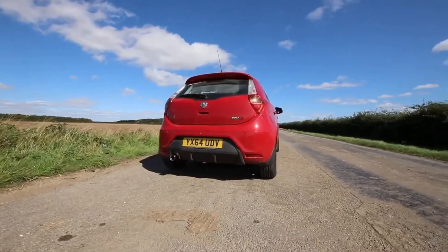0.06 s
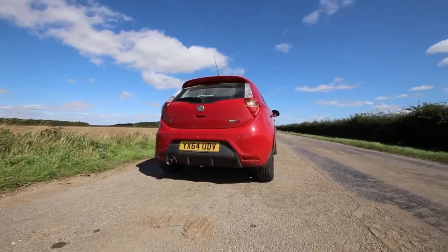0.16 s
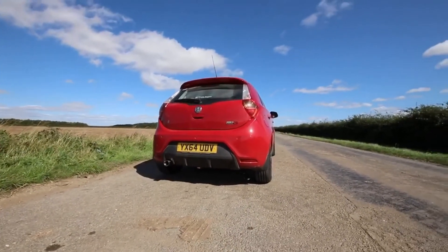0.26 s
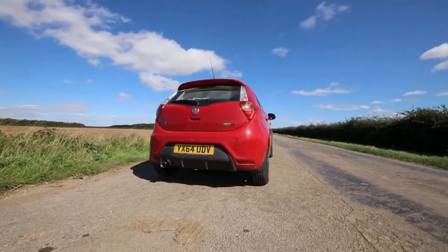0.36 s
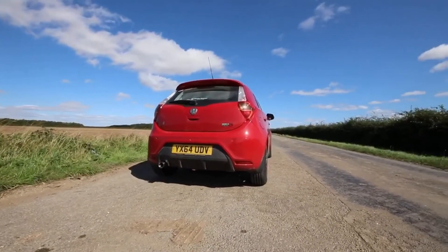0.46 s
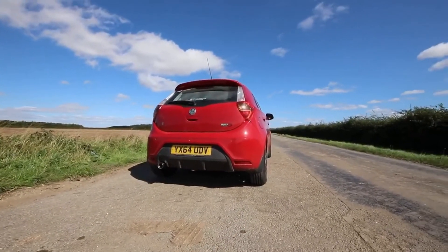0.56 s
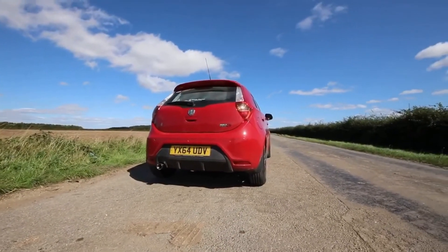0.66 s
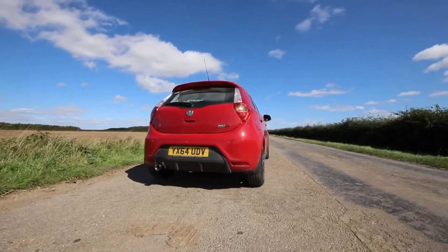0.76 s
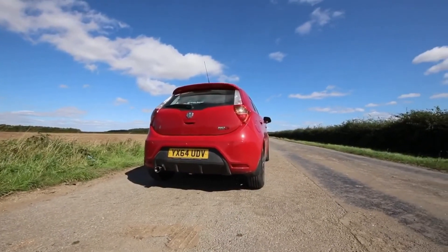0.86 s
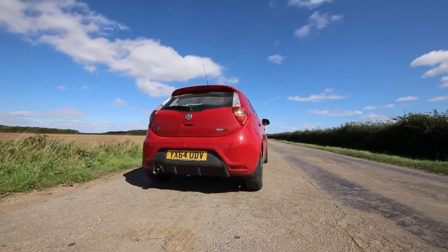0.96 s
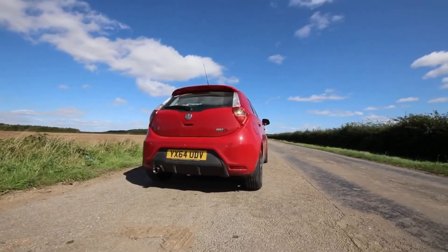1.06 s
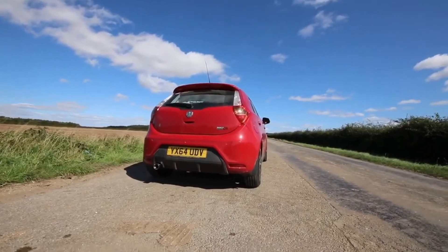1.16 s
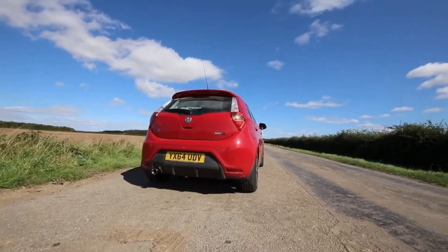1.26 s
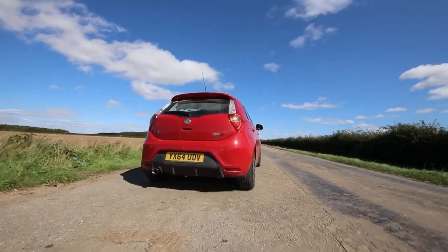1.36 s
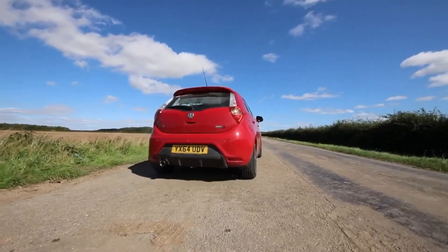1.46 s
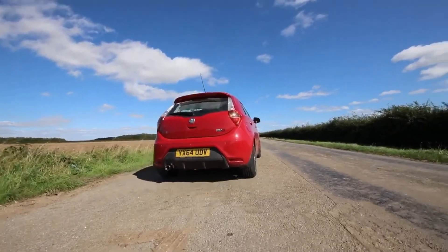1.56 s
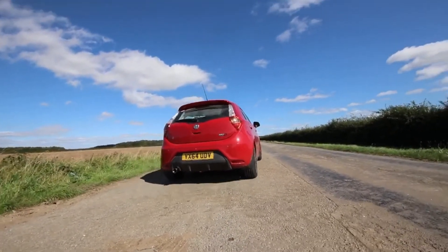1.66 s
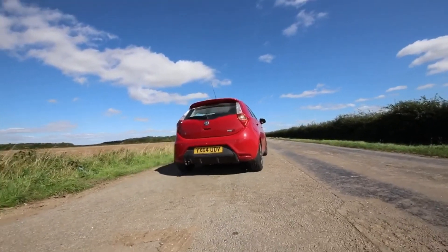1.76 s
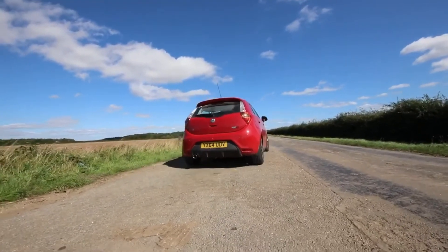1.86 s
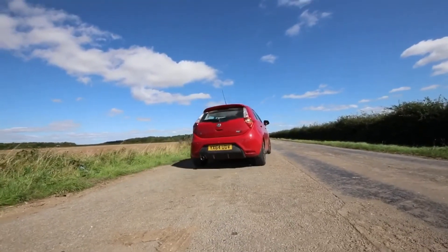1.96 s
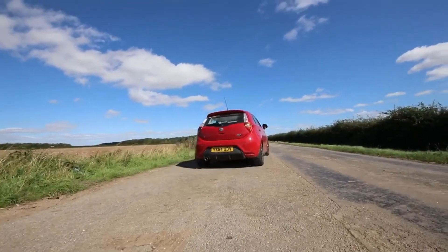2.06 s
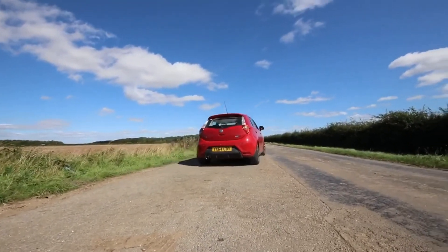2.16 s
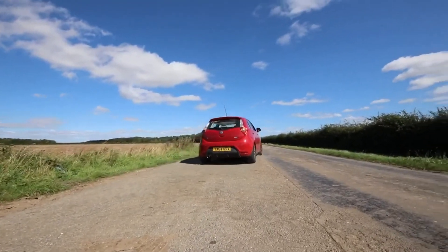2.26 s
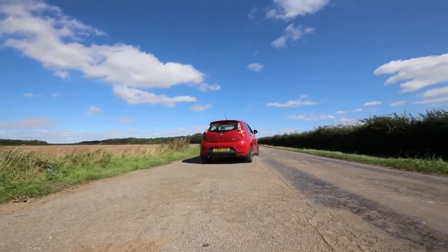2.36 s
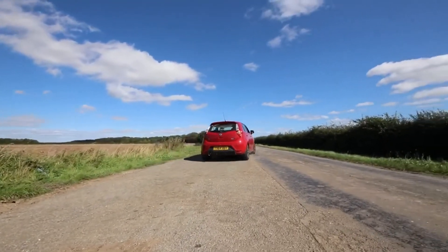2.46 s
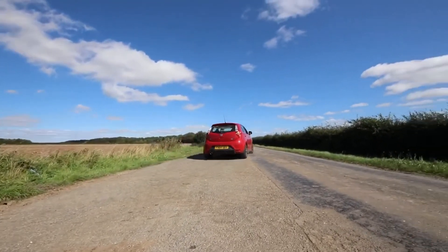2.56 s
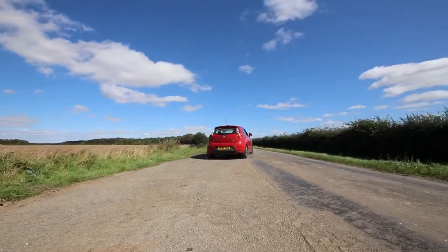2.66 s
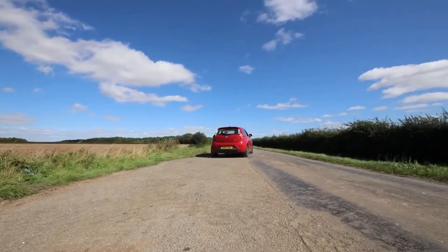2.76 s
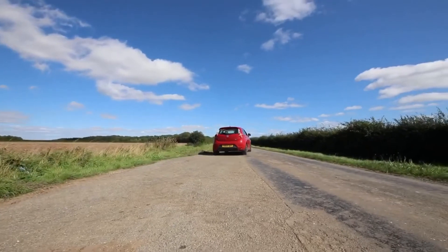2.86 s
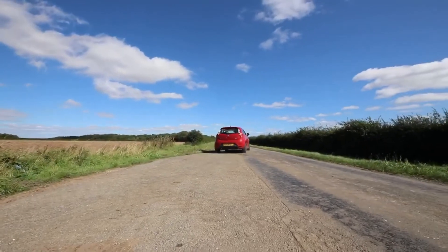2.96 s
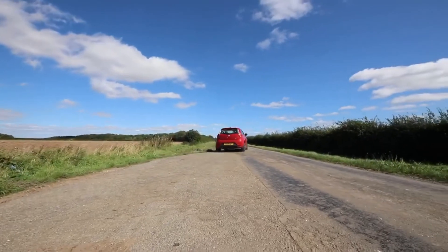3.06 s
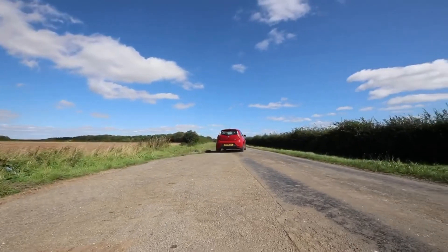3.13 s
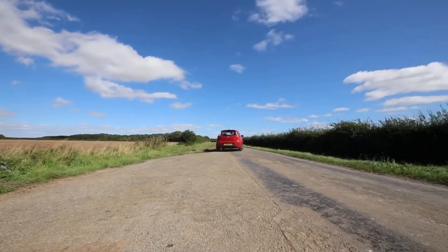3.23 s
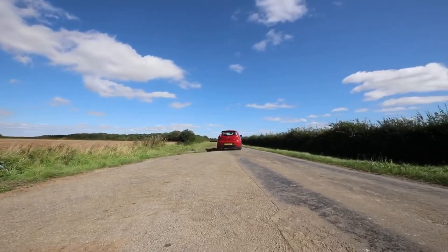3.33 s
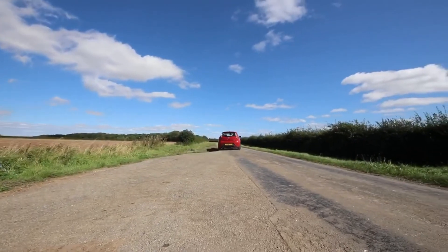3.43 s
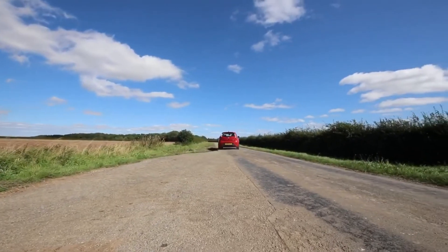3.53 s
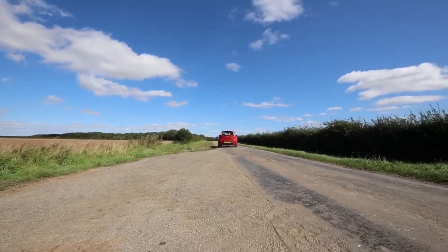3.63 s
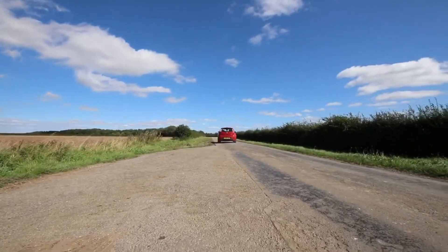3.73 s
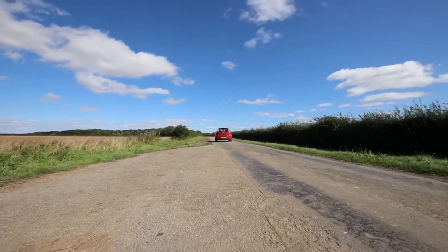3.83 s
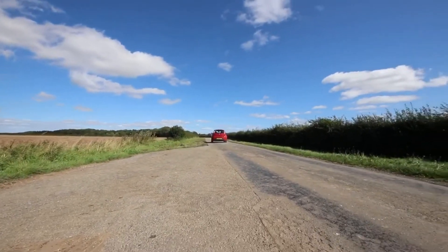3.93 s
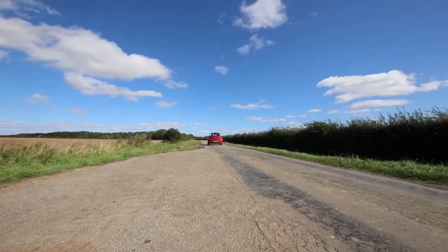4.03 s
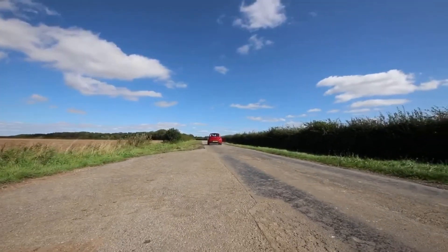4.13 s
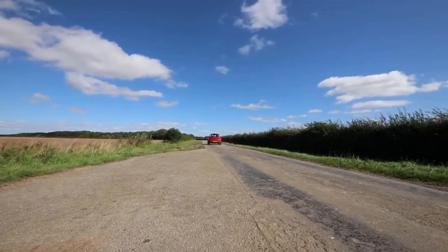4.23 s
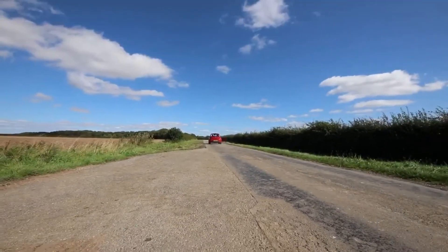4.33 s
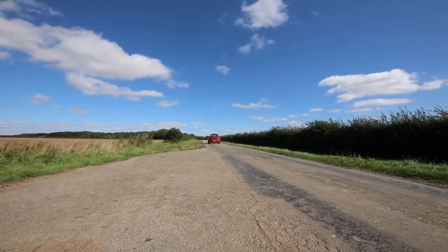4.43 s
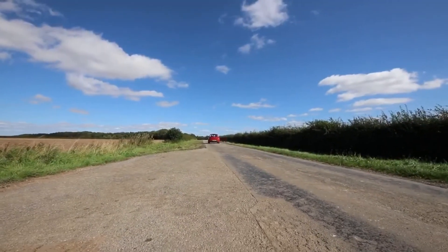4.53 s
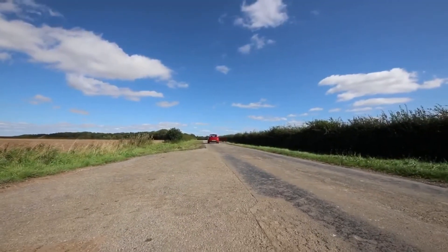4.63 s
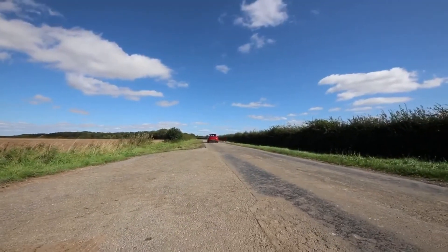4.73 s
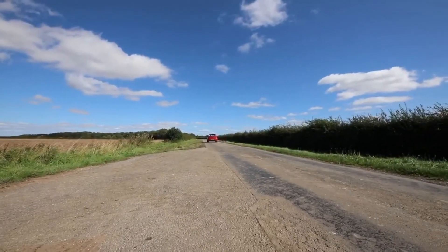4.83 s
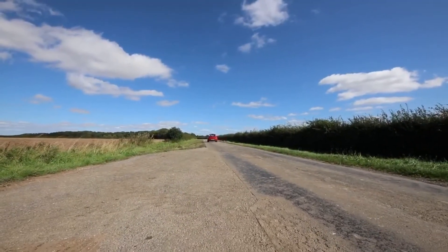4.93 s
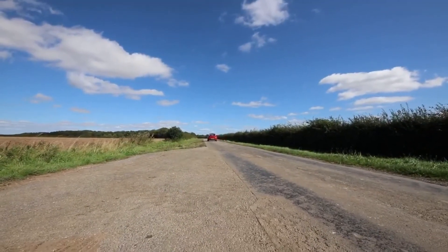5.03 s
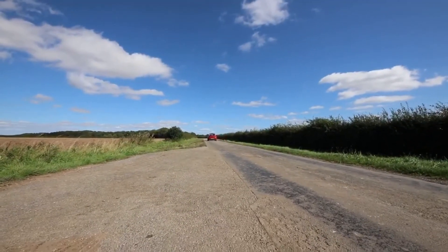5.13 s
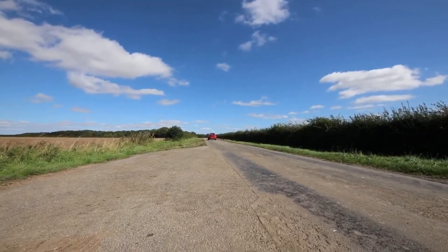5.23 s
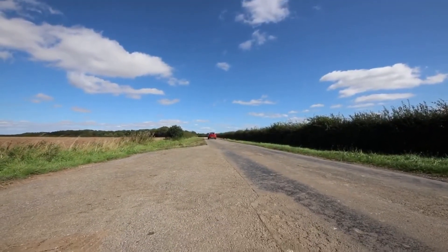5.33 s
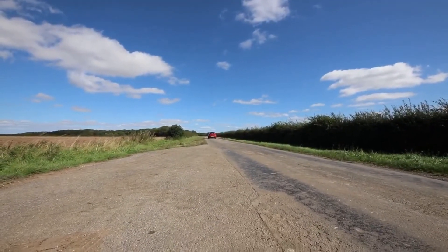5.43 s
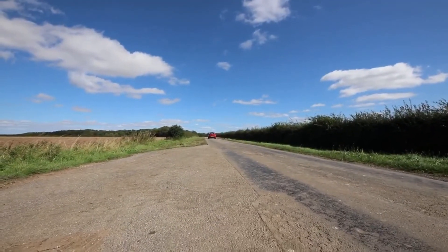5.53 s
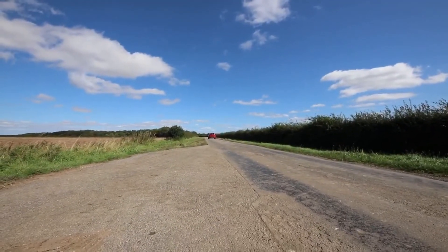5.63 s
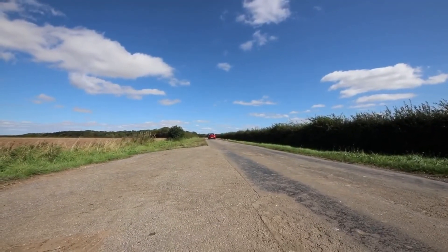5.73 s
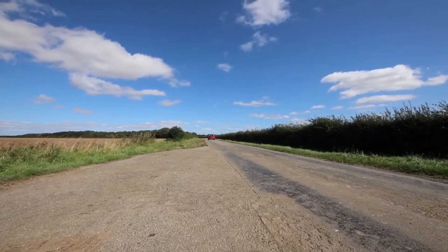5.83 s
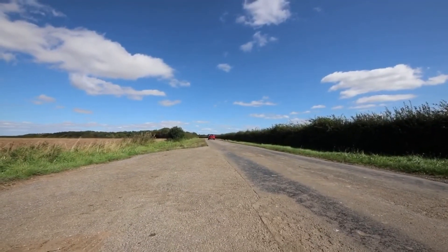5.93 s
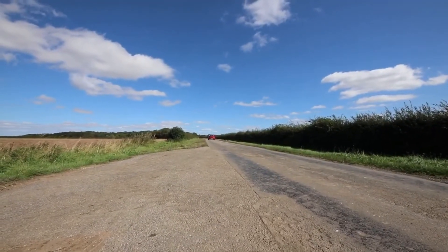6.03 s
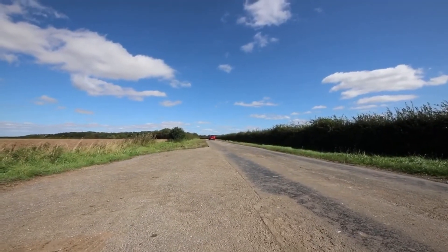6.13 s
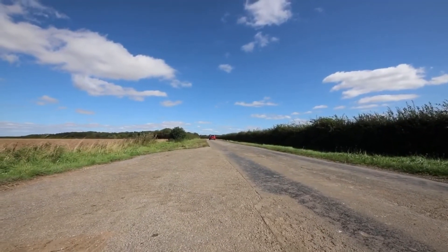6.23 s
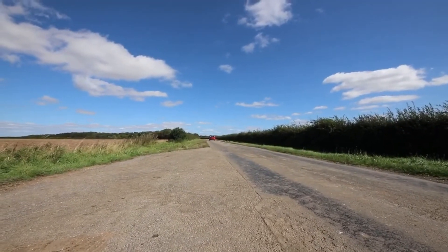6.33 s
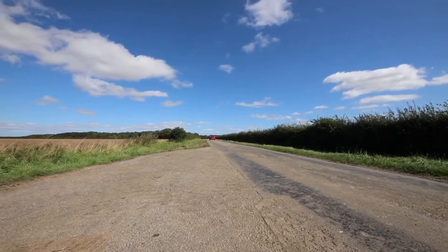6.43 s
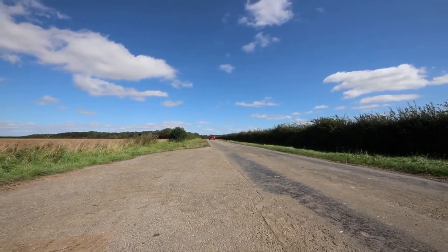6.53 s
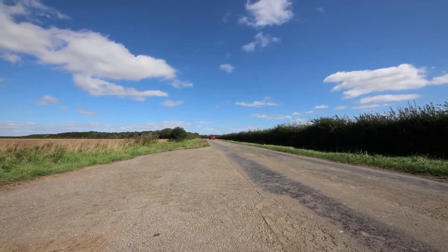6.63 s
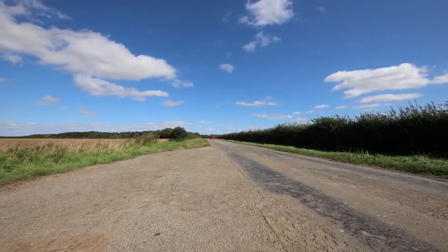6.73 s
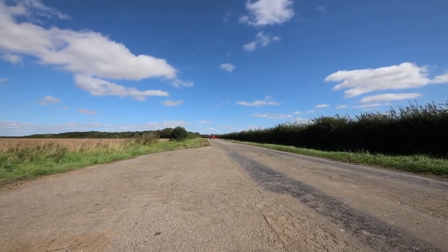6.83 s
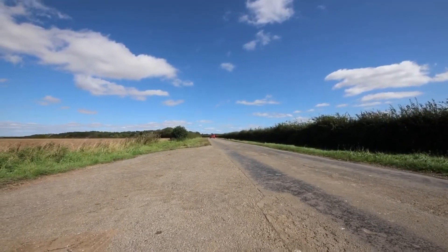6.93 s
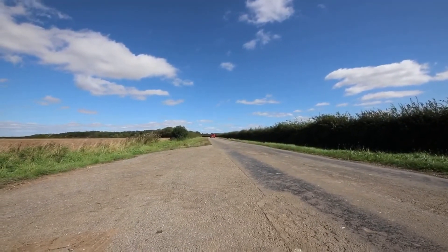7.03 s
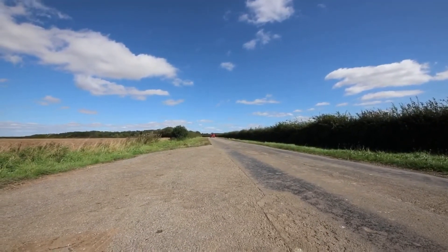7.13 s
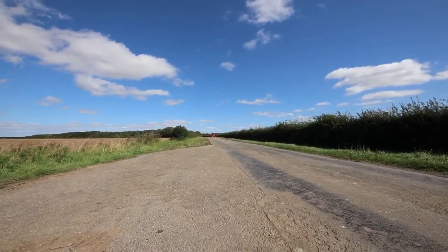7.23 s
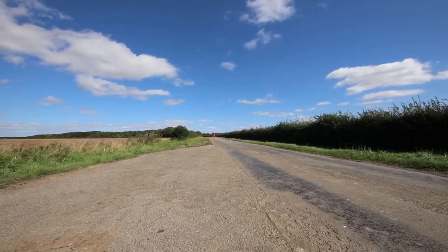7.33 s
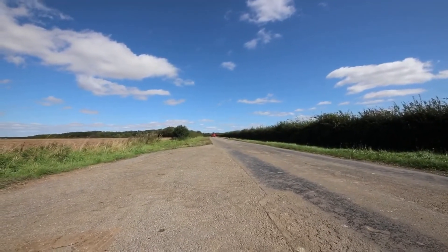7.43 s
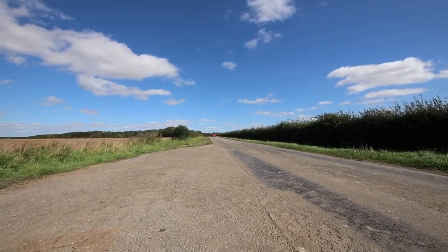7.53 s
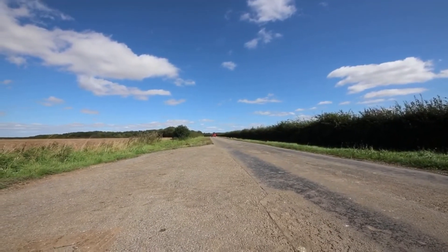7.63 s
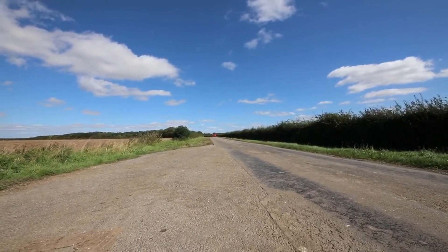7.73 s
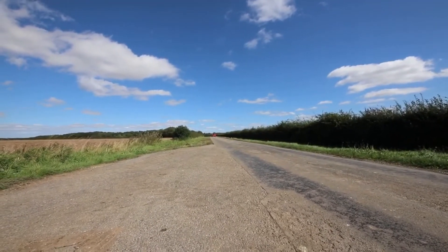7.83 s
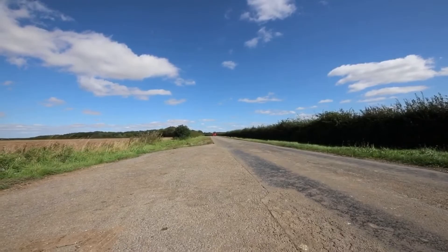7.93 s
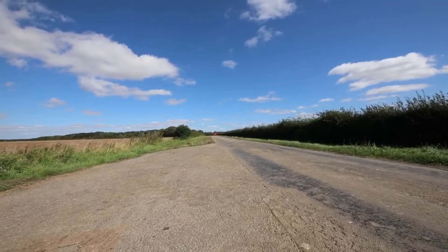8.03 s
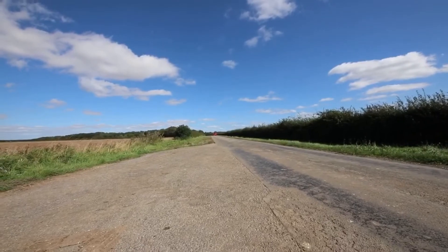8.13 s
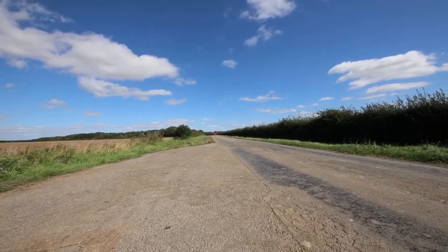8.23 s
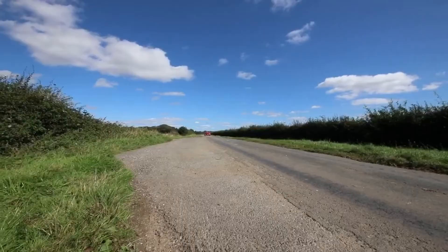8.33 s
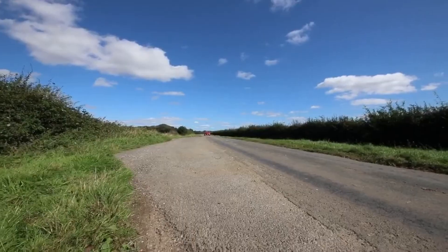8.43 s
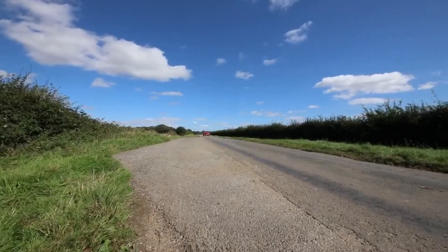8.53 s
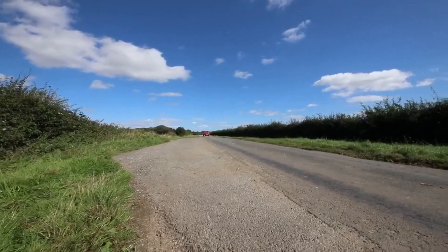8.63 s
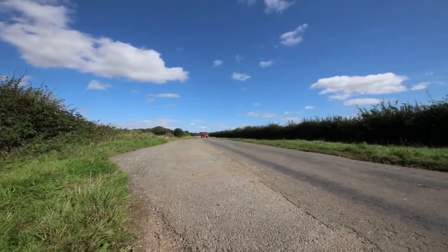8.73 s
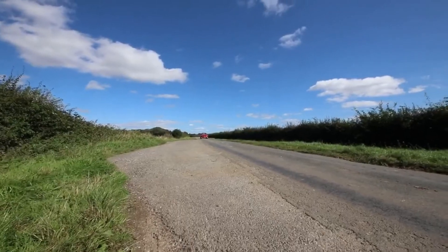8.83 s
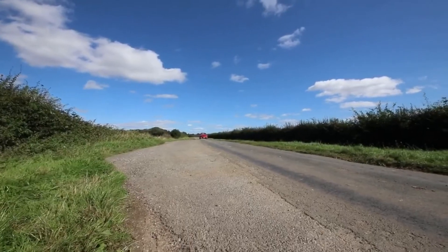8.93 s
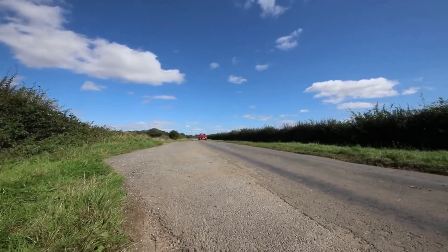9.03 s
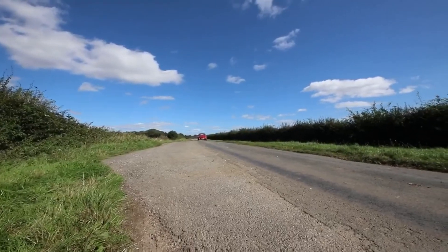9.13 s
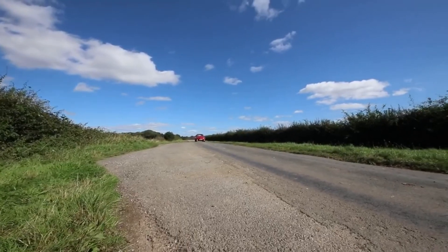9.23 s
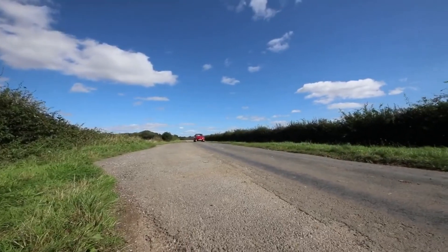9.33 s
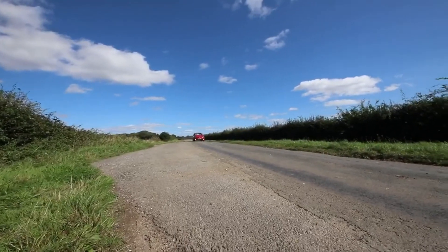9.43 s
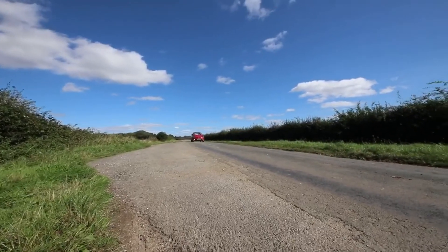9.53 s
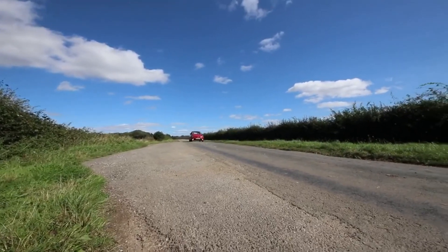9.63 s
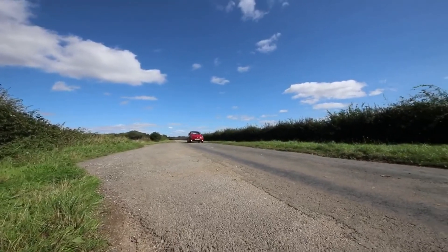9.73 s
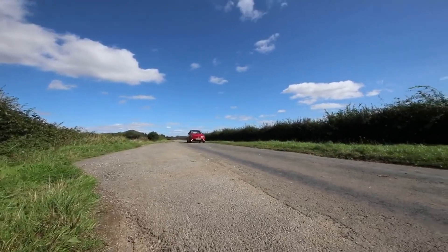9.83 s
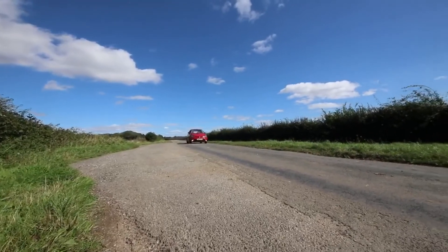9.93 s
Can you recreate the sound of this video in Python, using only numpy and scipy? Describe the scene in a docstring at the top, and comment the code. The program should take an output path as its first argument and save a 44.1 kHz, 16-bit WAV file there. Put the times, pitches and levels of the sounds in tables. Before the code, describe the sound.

Outdoors on an open lane, a small four-cylinder car with a loud exhaust slips its clutch right beside a roadside microphone, revs, shudders through a gear change with ticking grit, then accelerates away. It shifts again and fades while wind slaps the microphone. After an abrupt cut the tyre roar swells as the car returns, over a thin hedge hiss.

```python
"""A small four-cylinder car with a loud exhaust slips its clutch beside the microphone, pulls through first gear,
shudders through a shift as grit ticks and drives off down a lane, shifts up again and fades as wind slaps the ports.
After a cut at 8.3 s it comes back towards the microphone, its tyres roaring. The hedge hisses throughout.
The exhaust is sines at multiples of one firing rate, through pipe resonances, plus noise puffed by the firings;
tyres, hedge and grit are shaped noise, and wind is low noise plus short swings of pressure."""
import sys
import numpy as np
from scipy import signal
from scipy.io import wavfile
from scipy.ndimage import uniform_filter1d

SR = 44100
rng = np.random.default_rng(int(sys.argv[2]) if len(sys.argv) > 2 else 0)


def inscribe(sig):
    """Save sig as 16-bit PCM at rate SR to the path in sys.argv[1].

    A 1-D sig is mono; a 2-D sig holds one channel per row.
    Samples are clipped to [-1, 1] before scaling.
    """
    pcm = np.round(np.clip(np.atleast_2d(sig).T, -1, 1) * 32767)
    wavfile.write(sys.argv[1], SR, pcm.astype(np.int16))


N = 440118
T = np.arange(N) / SR
CUT_S, FADE_IN_S = 8.3364, .013  # the cut between the two passes, and the fade-in after it
LEFT_RIGHT = np.array([[1], [-1]])  # opposite signs at the two ports


def undb(db):
    """Amplitude of a level in dB."""
    return 10 ** (np.asarray(db) / 20)


def unit(x):
    """Scales to rms 1."""
    return x / np.sqrt(np.mean(x ** 2))


def curves(table):
    """Columns of a table, joined by straight lines in time."""
    s, *columns = np.transpose(table)
    return [np.interp(T, s, c) for c in columns]


def dips(table):
    """Sum of short flat-topped changes in level, dB."""
    return sum(db * np.exp(-((T - s) / w) ** 4) for s, db, w in table)


def walk(rate):
    """Random levels held 1 / rate s and slewed twice; spread near 1."""
    k = int(SR / rate)
    steps = np.repeat(rng.standard_normal(N // k + 1), k)
    return 1.28 * uniform_filter1d(uniform_filter1d(steps, k), k)[:N]


def filtered(x, hz, kind, order):
    """Butterworth filter."""
    return signal.sosfilt(signal.butter(order, hz, kind, fs=SR, output="sos"), x)


def band(lo_hz, hi_hz, order=2):
    """Band of noise, rms 1."""
    return unit(filtered(rng.standard_normal(N), [lo_hz, hi_hz], "bandpass", order))


SWELL = .5  # shared swell of all bands against the flicker of each
LEAN_HZ, HUMP_HZ = 2600, 1670  # centres of the band that leans to one side and of the band that fills out


def coloured(table, flicker_db, apart_hz, tilt_db, lean_db=0, hump_db=0):
    """Half-octave noise bands under a tilting spectrum swell together, flicker alone and widen upwards."""
    hzs, dbs = np.transpose(table)
    out, swell = 0, SWELL * walk(6)
    for hz in hzs[0] * 2 ** np.arange(.25, np.log2(hzs[-1] / hzs[0]), .5):
        mid, side = (band(hz / 2 ** .25, hz * 2 ** .25) for _ in range(2))
        # 10 log10(hz) turns level per Hz into level per band
        db = np.interp(np.log(hz), np.log(hzs), dbs) + 10 * np.log10(hz)
        db = db + flicker_db * (walk(9) + swell)
        db = db + hump_db * np.exp(-(2 * np.log2(hz / HUMP_HZ)) ** 2)
        db = db + tilt_db * np.log2(hz / 1200)
        lean = lean_db * np.exp(-(2 * np.log2(hz / LEAN_HZ)) ** 2) * LEFT_RIGHT / 2
        apart = min(0.009 + (hz / apart_hz) ** 2, 1)
        out = out + undb(db + lean) * (mid + apart * side * LEFT_RIGHT)
    return unit(out)


# Colour of a faint wide background noise. Each row: frequency in Hz, relative level in dB per Hz.
WIDE_COLOUR = [(600, -9), (1200, 1), (2000, -4), (3200, -7.5), (5200, -17)]
# Its level over time. Each row: time in seconds, level in dB.
WIDE_LEVEL = [(0, -79), (5.5, -75), (7.3, -75), (7.8, -59), (8.9, -55), (9.3, -76)]


def wide_noise():
    """Faint wide background: noise almost independent at the two ports in its treble."""
    return undb(curves(WIDE_LEVEL)[0]) * coloured(WIDE_COLOUR, flicker_db=2, apart_hz=500, tilt_db=0)


BREEZE_DB, BUFFET_DB = -59, 4  # breeze level; spread of the buffeting
GUST_EDGE, APART = 1.24, 0.1  # exponent of the gust's rise and fall; share of rumble that differs by port
# Gusts on the ports. Each row: middle in seconds, level in dB, half length in seconds, left minus right in dB.
GUSTS = [(0.452, -47, 0.31, 4), (2.156, -48.5, 0.14, 1), (3.696, -57, 0.38, 2), (4.646, -52, 0.052, -0.5),
         (5.127, -34, 0.093, 7), (5.6, -38, 0.11, 10), (5.904, -37.5, 0.15, 0.5),
         (7.076, -40.5, 0.19, -0.5), (7.673, -44, 0.056, 6), (8.455, -40.5, 0.12, -7),
         (8.95, -46.5, 0.29, 2.5), (9.35, -42, 0.095, 0), (9.702, -36, 0.2, 0)]


def wind_rumble():
    """A centred breeze and gusts that lean to one port: buffeted low noise from turbulence at the microphone."""
    both = band(34, 120)
    gusts = sum(undb(db + LEFT_RIGHT / 2 * lean_db) * np.exp(-np.abs((T - s) / half_s) ** GUST_EDGE)
                for s, db, half_s, lean_db in GUSTS)
    apart = np.array([APART * band(22, 71) for _ in range(2)]) * (T > 4.95)
    return (undb(BREEZE_DB) * both + gusts * (both + apart)) * undb(BUFFET_DB * walk(20))


# bright edge of a -19 dB slap against its swing; harder slaps are brighter, dB per dB
EDGE_DB, EDGE_SLOPE = -21.5, 0.85
# Wind slaps on the ports. Each row: middle in seconds, peak level in dB, frequency of the swing in Hz,
# left minus right in dB, half length in swings.
SLAPS = [(5.58, -22, 90, 20, 0.43), (5.618, -18.5, 151, 20, 0.36), (5.645, -21, 90, 19, 0.31),
         (5.669, -14, 100, 10, 0.55), (5.679, -14.5, 362, 12, 1.2), (5.69, -8.5, 254, 7, 0.48),
         (5.709, -23, 200, 12, 0.5), (5.807, -13.5, 120, 2, 0.55), (5.8745, -8.5, 292.5, 5.5, 0.62),
         (5.884, -14, 200, 3, 0.59), (6.0, -22, 149.6, 1.5, 0.44), (6.065, -16.5, 200, 6, 0.39),
         (6.995, -22, 110.6, 2, 0.54), (7.025, -24, 169.6, -1, 0.72), (7.074, -23, 150.1, 3, 0.62),
         (7.18, -22, 117, 1.5, .5), (7.636, -24, 111.2, 6, 0.43), (7.681, -23.5, 61.9, 1, 0.52),
         (8.315, -33, 90, 7, 0.59)]


def wind_slaps():
    """Slaps of air on the ports: a few swings of pressure with a noisy edge."""
    out, edge = 0, band(150, 888, order=3)
    for s, db, hz, lean_db, swings in SLAPS:
        turn = (T - s) * hz
        swing = np.sin(2 * np.pi * turn + 0.22) + undb(EDGE_DB + EDGE_SLOPE * (db + 19.0)) * edge
        out = out + undb(db + LEFT_RIGHT / 2 * lean_db) * np.exp(-(turn / swings) ** 2) * swing
    return out


# Tyres on the lane. Each row: time in seconds, roar in dB before the tilt, tilt in dB per octave about 1200 Hz.
ROAD = [(0.04, -44, 10), (0.56, -54.5, 11), (1.0, -40.5, 9), (1.53, -43, 6.5), (1.76, -43, -3),
        (1.8, -32, 2), (1.87, -28.5, 1), (1.93, -32.5, 0), (2.05, -39.5, 2.5), (2.3, -40, 3.5),
        (2.6, -38, 8), (2.91, -41.5, -1.5), (3.4, -39.5, 0.5), (3.9, -35, -0.5), (4.2, -38, -1.5),
        (4.45, -36.5, 6.5), (4.65, -41.5, -4.5), (5.04, -39, 2), (5.21, -40, -2.5), (5.95, -40.5, -2.5),
        (6.15, -40, 0.5), (6.5, -45, 3.5), (6.75, -40.5, 1.5), (6.95, -38, 1.5), (7.25, -38.5, -0.5),
        (7.48, -38, 0), (7.6, -41.5, 0), (7.78, -43.5, -0.5), (8.16, -48.5, -1), (8.6, -43.5, 2),
        (8.99, -38.5, 0.2), (9.3, -29, 1.5), (9.55, -25, 0.5), (9.75, -22.5, 3.5), (9.96, -19.5, 3.5)]
# The hedge's hiss. Each row: frequency in Hz, relative level in dB per Hz.
HISS_COLOUR = [(4000, -6.5), (5000, -25), (6500, 10), (8500, 8.5), (10500, 2.5), (12000, -12)]
# Swells of the hiss. Each row: middle in seconds, rise in dB, half width in seconds.
HISS_SWELLS = [(4.43, 1.5, .2), (5.06, 3, 0.15)]
# steady part dB, following part at a roar of -40 dB, dB per dB of roar, dB per unit of tilt
HEDGE_DB, HISS_DB, HISS_SLOPE, HISS_BRIGHT = -66, -65, 0.69, 0.91


def hedge_hiss():
    """Wide hiss: a steady part joined by a part that follows the tyre roar."""
    roar_db, tilt_db = curves(ROAD)
    hiss_db = HISS_DB + HISS_SLOPE * (roar_db + 40) + HISS_BRIGHT * tilt_db + dips(HISS_SWELLS)
    level = np.hypot(undb(hiss_db), undb(HEDGE_DB))
    return level * coloured(HISS_COLOUR, flicker_db=1.5, apart_hz=6500, tilt_db=0)


# The tyres' colour. Each row: frequency in Hz, relative level in dB per Hz.
ROAR_COLOUR = [(110, -1.5), (200, 3.5), (450, 4), (650, -4.5), (1000, 1), (1400, -4.5), (1900, -10.5),
               (3000, -22), (4100, -35), (5200, -49)]
# The band around HUMP_HZ fills out and hollows over time. Each row: time in seconds, change in dB.
HUMP = [(1.9, -2), (4.2, -1.5), (6.0, 1.5), (7.7, 4), (8.5, -4.5), (9.8, 1.5)]


def tyre_roar():
    """Tyres on the road: nearly centred noise whose treble leans right."""
    roar_db, tilt_db = curves(ROAD)
    return undb(roar_db) * coloured(ROAR_COLOUR, flicker_db=1.9, apart_hz=7000, tilt_db=tilt_db,
                                    lean_db=-2, hump_db=curves(HUMP)[0])


GRAIN_DB = 5  # spread of the fast grain
# Grit under the tyres. Each row: middle in seconds, level of the top band in dB, half length in seconds,
# low band against the top in dB.
TICKS = [(1.784, -57, 0.013, 15.5), (1.869, -46.5, 0.023, 8), (1.995, -62, 0.011, 22.5),
         (2.18, -51, 0.024, 14), (2.6, -60, 0.013, 25.5), (2.859, -40, 0.0011, 5),
         (2.87, -36.5, 0.0015, 8.5), (2.877, -42.5, 0.0029, 5), (3.678, -48, 0.0041, 2),
         (3.825, -46.5, 0.0041, 13), (6.165, -55, 0.0021, 7)]


def grit():
    """Short grainy bursts of noise, wide on top, centred below."""
    top, low = np.array([band(5700, 9100) for _ in range(2)]), band(590, 1900)
    grain = unit(undb(GRAIN_DB * walk(300)))
    return grain * sum(undb(db) * np.exp(-((T - s) / half_s) ** 2) * (top + undb(low_db) * low)
                       for s, db, half_s, low_db in TICKS)


# A thin whine that falls and rises with the engine. Each row: time in seconds, frequency in Hz, rms level in dB.
WHINE = [(.15, 1460, -70), (.19, 1476, -59), (.3, 1380, -53), (.4, 1353, -65), (.53, 1218, -67),
         (.59, 1145, -52), (.68, 1105, -55), (.76, 1144, -48), (.79, 1210, -75)]


def thin_whine():
    """One gliding sine of wavering level."""
    hz, db = curves(WHINE)
    return np.sqrt(2) * undb(db + 1.5 * walk(25)) * np.sin(2 * np.pi * np.cumsum(hz) / SR)


# The exhaust shudders as the engine bogs down or the throttle shuts.
# Each row: middle in seconds, level in dB, half length in seconds.
SHUDDERS = [(0.195, -29, 0.041), (1.862, -42, 0.047), (2.15, -34.5, 0.18), (4.651, -39, 0.035)]


def shudder():
    """Brief bursts of low noise from the exhaust."""
    return band(75, 264) * sum(undb(db) * np.exp(-((T - s) / half_s) ** 4) for s, db, half_s in SHUDDERS)


CLATTER_GATE = .45  # depth by which the firings chop the clatter
# Valves and tailpipe. Each row: time in seconds, valve clatter in dB, rasp of the tailpipe in dB.
CLATTER = [(0, -81, -35.5), (.2, -51, -62), (.65, -60, -63.5), (1.0, -54, -36), (1.5, -51.5, -33.5),
           (1.75, -58, -48.5), (2.3, -57, -50.5), (2.65, -50.5, -37.5), (3.1, -53, -45), (4.55, -54, -39),
           (4.75, -52, -65), (5.06, -47.5, -46), (5.17, -51.5, -73), (5.3, -60, -55), (7.5, -87, -51.5),
           (8.0, -89, -94)]


def valve_clatter(phase):
    """Two bands of noise chopped once a firing."""
    chop = unit(np.exp(CLATTER_GATE * np.cos(phase - 2)))
    level = undb(curves(CLATTER)[0] + 2.26 * walk(24.84))
    return level * chop * (band(900, 1450) + band(1815, 3260))


# The engine slips the clutch, pulls through first gear, shifts with a shudder, coasts; then comes back.
# Each row: time in seconds, firing rate in Hz.
REVS = [(0.0, 94.2), (0.06, 101.7), (0.13, 111.4), (0.235, 98.45), (0.29, 102.6), (0.5, 91.76), (0.71, 81),
        (0.82, 96.6), (1.05, 129.3), (1.17, 132.7), (1.3, 127.7), (1.6, 107.8), (1.99, 80.1), (2.19, 75.15),
        (2.35, 80.4), (2.47, 86.05), (3.0, 111.6), (3.15, 118.8), (3.3, 123), (3.42, 129.7), (4.0, 161.4),
        (4.41, 176.7), (4.5, 181.8), (4.61, 168.1), (4.89, 146.4), (5.05, 143), (5.12, 129.4), (5.18, 97.3),
        (5.23, 96.7), (5.37, 117.3), (5.5, 101.4), (5.6, 113), (5.76, 109.8), (5.82, 114), (7.17, 132),
        (7.7, 132.7), (8.335, 100.4), (8.338, 132.5), (8.9, 132.9), (9.23, 129.2), (9.39, 124.8),
        (9.47, 115.7), (9.72, 113.5), (9.96, 97.5)]


def crank():
    """Firing rate, and its phase (one turn per firing) with a slight flutter."""
    hz, = curves(REVS)
    return hz, 2 * np.pi * np.cumsum(hz * (1 + 0.0029 * walk(40))) / SR


# driving away lowers the resonances as heard: gathers speed from, to (s), top speed m/s
SPEED_FROM_S, SPEED_TO_S, TOP_M_S = 2.91, 4.5, 23
# The exhaust. Each row: time in seconds, level in dB, brightness in dB per octave about 250 Hz,
# odd over even firing orders in dB.
LOAD = [(0.0, -21, -2, -5), (0.13, -24, -2, -2), (0.18, -28.5, 0.5, 1), (0.23, -27, -8.5, -3),
        (0.3, -27, -8, 0.5), (0.48, -24, -4.5, 5.5), (0.55, -30.5, -2, 2), (0.85, -24, -1.8, -4),
        (1.05, -24, -1.5, -9.5), (1.3, -23, 0, -8), (1.6, -22, 0, -3), (1.85, -29.5, -4.5, -3.5),
        (2.05, -29, 5.5, 7), (2.3, -33.5, 11, 2.5), (2.45, -29, 2.5, -0.5), (2.65, -26, 0.3, -6),
        (2.85, -26.5, 1.5, -1.5), (3.1, -27.5, 3.5, 1), (3.35, -27, 2, -6.5), (3.45, -26, 1.5, -1),
        (3.6, -23, 2, 0.5), (4.0, -21, 1.5, 4), (4.4, -22.5, 4.5, 3.5), (4.59, -21.5, 6.5, 2.5),
        (4.64, -30.5, 0, 0.5), (4.9, -28.5, -4, 3), (5.05, -24, -3.5, -10), (5.3, -28.5, -1.5, -1),
        (5.55, -25.5, -1.5, -3), (5.9, -27.5, -0.5, -1.5), (6.1, -32, 2.5, -2), (6.6, -33, 2.5, -6),
        (7.2, -32, 0.5, 2), (7.65, -38, 2.5, -3), (7.72, -48, -2, 10), (7.95, -46.5, -2, 4),
        (8.15, -46, -1, -1), (8.33, -46, -3, 6.5), (8.35, -55, 0, 27), (8.45, -44, -4.5, 7),
        (8.9, -38, 0, 2.5), (9.15, -38.5, -5, -5), (9.26, -45, -7, 4), (9.45, -51.5, -10, 1),
        (9.5, -35, -1, -5.5), (9.69, -37, -2.5, 0), (9.75, -59, -2, -2), (9.98, -34, 4, -5)]
# The engine note drops out. Each row: middle in seconds, change in dB, half width in seconds.
LIFTS = [(.155, -9, 0.015), (.705, -7, 0.03), (5.13, -13, 0.066), (9.22, -21, 0.046)]
# Pipe resonances at rest, which the firing orders slide through. Each row: frequency in Hz, gain in dB.
PIPE = [(75.0, 2), (85.0, -8.5), (105.0, 0.8), (145.0, -7.5), (205.0, 2), (240.0, -4.5), (295.0, -0.5),
        (350.0, -9), (405.0, -2), (465.0, -12), (520.0, -5), (560.0, -13), (650.0, -14), (900.0, -33)]
# Added colour when the car faces the microphone. Each row: frequency in Hz, gain in dB.
FRONT = [(100.0, 10), (200.0, -1.5), (400.0, -5.5), (520.0, 11.5), (650.0, -9)]
# The silencer's resonances. Each row: frequency in Hz, gain in dB against the rasp.
SILENCER = [(400, -2), (560, 7), (700, -3.5), (820, -5), (950, -13.5), (1150, -8.5), (1500, -42)]
# Rasp orders above RASP_TOP_HZ, buried at first, clear at full throttle. Each row: time in seconds, change in dB.
RASP_TOP, RASP_TOP_HZ = [(2.2, -9), (2.6, -2), (3.6, -2), (4.1, 2), (4.6, 2), (5.0, -6)], 860


def order_levels(hz):
    """Levels of 11 firing orders: five shaped by the pipe, six of rasp by the silencer; and the rasp itself."""
    def colour(f, table):
        hzs, dbs = np.transpose(table)
        return np.interp(np.log(f), np.log(hzs), dbs)

    level_db, bright, odd_db = curves(LOAD)
    level_db = level_db + dips(LIFTS)
    rasp_db = curves(CLATTER)[1] + dips(LIFTS)
    away = 1 + np.interp(T, [SPEED_FROM_S, SPEED_TO_S], [0, TOP_M_S / 343]) * (T < CUT_S)
    order_db = []
    for k in range(1, 6):
        db = level_db + (k % 2 - .5) * odd_db + bright * np.log2(k * hz / 250)
        order_db.append(db + colour(k * hz * away, PIPE) + (T > CUT_S) * colour(k * hz, FRONT))
    # the silencer lets little through above its last resonance
    for k in range(6, 12):
        top = np.clip((k * hz - RASP_TOP_HZ) / 60 + .5, 0, 1)
        order_db.append(rasp_db + np.interp(k * hz, *np.transpose(SILENCER)) + curves(RASP_TOP)[0] * top)
    return order_db, rasp_db


# rough at low revs, clean at high: dB per octave that the firing rate lies below ROUGH_HZ
ROUGH_HZ, ROUGH_DB_PER_OCT = 115, 5
# Ragged as the clutch bites and at each change of throttle. Each row: time in seconds, added roughness in dB.
RAGGED = [(0, 1), (.15, 2), (.19, 9), (.3, 5), (.5, 4), (.72, 4), (.85, 0), (1.7, 0), (1.85, 4), (1.95, -1),
          (2.4, -1), (2.55, 1), (2.65, -4), (3.0, -3), (4.55, -3), (4.65, 1), (5.15, 0), (5.3, -4),
          (5.9, -2), (6.2, 1), (7.6, 1), (7.8, 5), (8.33, 5), (8.4, 1)]


def roughness(hz):
    """Extra gas noise in dB; the lines between the orders take half of it."""
    return ROUGH_DB_PER_OCT * np.log2(ROUGH_HZ / hz) + curves(RAGGED)[0]


GAS_DB, RASP_HISS_DB = -13, -2  # noise against the upper orders' effort, and against the rasp
PUFF_DEPTH = .4  # how deeply the gas puffs


def exhaust_gas(phase, order_db, rasp_db, rough_db):
    """Turbulent gas: a low band that follows the effort and a rasping one, puffed once a firing."""
    puff = unit(np.exp(PUFF_DEPTH * np.cos(phase - 1)))
    effort = np.sqrt(sum(undb(db) ** 2 for db in order_db[1:]))
    low = effort * undb(GAS_DB + rough_db) * band(191, 517, order=4)
    rasp = undb(rasp_db + RASP_HISS_DB + rough_db) * band(630, 806, order=4)
    return puff * (low + rasp)


FRONT_LAG, TAIL_LAG = 1.7, .03  # radians; radians per squared order
HALF_DB, QUARTER_DB = -8.5, -11  # lines at half and quarter orders against their neighbours
WANDER = .2  # radians by which the orders drift, times sqrt(order - 1)
RASP_WAVER_DB, RASP_WANDER = 3.5, .6  # the rasp's orders are ragged in level (dB) and phase (radians)
STROKE_DB = .7  # scatter in strength from firing to firing
# How much the lower orders waver, more once the far car coasts. Each row: time in seconds, spread in dB.
WAVER = [(7.4, 1.2), (7.75, 3.5), (8.33, 3.5), (8.4, 1.5)]
# Strength of the half-order lines over time. Each row: time in seconds, change in dB.
HALVES = [(0, -1), (1.0, -6.5), (2.2, -1.5), (3.0, 5), (3.8, 2.5), (4.5, 6), (5.0, -4), (6.0, 1.5),
          (6.6, 4.5), (7.3, 2), (7.8, -2)]
# The cylinders differ mostly in the upper ring of the pipe. Each row: frequency in Hz, gain in dB.
UNEVEN = [(300, -24.5), (450, -2)]


def firing_orders(hz, phase, order_db, rough_db):
    """Sines at multiples of the firing rate on one phase, with lines between from unequal cylinders."""
    out, waver_db = 0, curves(WAVER)[0]
    parts = (.25, QUARTER_DB), (.5, HALF_DB + curves(HALVES)[0]), (.75, QUARTER_DB)
    for k, db in enumerate(order_db, 1):
        if k > 5:
            spread_db, drift = RASP_WAVER_DB, RASP_WANDER * walk(40)
        else:
            spread_db, drift = waver_db, WANDER * np.sqrt(k - 1) * walk(15)
        # lags that grow with the order make every firing a steep front with a ringing tail
        lag = FRONT_LAG + TAIL_LAG * k ** 2
        out = out + undb(db + spread_db * walk(30)) * np.cos(k * phase - lag + drift)
        if k == 1:
            continue
        between_db = (db + order_db[k - 2]) / 2
        for part, part_db in parts:
            uneven_db = np.interp((k - part) * hz, *np.transpose(UNEVEN))
            line_db = between_db + rough_db / 2 + part_db + uneven_db + 3 * walk(12)
            out = out + undb(line_db) * np.cos((k - part) * phase - 1.1 - 0.42 * k)
    strength = rng.standard_normal(N // 100)[(phase / (2 * np.pi) + .5).astype(int)]  # one draw per firing
    # sqrt(2) makes each line's dB an rms level
    return np.sqrt(2) * out * unit(undb(STROKE_DB * uniform_filter1d(strength, size=100)))


def engine():
    """Firing orders, gas and clatter locked to one crank phase, with a free whine and shudders."""
    hz, phase = crank()
    order_db, rasp_db = order_levels(hz)
    rough_db = roughness(hz)
    orders = firing_orders(hz, phase, order_db, rough_db)
    gas = exhaust_gas(phase, order_db, rasp_db, rough_db)
    return orders + gas + valve_clatter(phase) + thin_whine() + shudder()


# A faint opposite-sign copy widens the upper exhaust note. Each row: time in seconds, level in dB against the car.
ENGINE_WIDTH = [(0, -30), (1.8, -29.5), (2.4, -54), (3.3, -51.5), (4.2, -30), (6.2, -44)]


def car_widened():
    """The centred car plus its sound above 300 Hz, 90 samples late and of opposite sign at the two ports."""
    car = engine()
    wide = filtered(np.roll(car, shift=90), 300, "highpass", order=3)
    return car + undb(curves(ENGINE_WIDTH)[0]) * wide * LEFT_RIGHT


# The whole sound dips briefly. Each row: middle in seconds, change in dB, half width in seconds.
LEVEL_DIPS = [(4.076, -12, 0.03)]


def scene():
    """Wide noise, wind, hedge, tyres, grit and car summed at the microphone."""
    background = wide_noise() + wind_rumble() + wind_slaps() + hedge_hiss()
    return (background + tyre_roar() + grit() + car_widened()) * undb(dips(LEVEL_DIPS))


TOP_HZ, CEILING = 11700, .6  # steep treble limit; amplitude where peaks round off


def record(dry):
    """The microphone loses the deepest bass, peaks are rounded off, the cut fades in, the top is cut steeply."""
    thin = filtered(dry, 38, "highpass", order=2)
    rounded = CEILING * np.tanh(thin / CEILING)
    edit = np.where(T < CUT_S, 1, np.clip((T - CUT_S) / FADE_IN_S, 0, 1))
    return signal.sosfilt(signal.ellip(10, .2, 80, TOP_HZ, fs=SR, output="sos"), edit * rounded)


dry = scene()
out = record(dry)
inscribe(out)
```